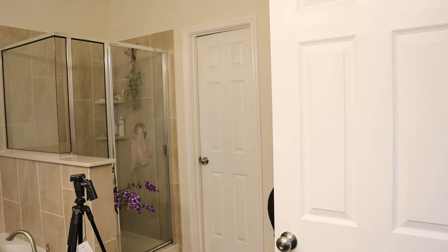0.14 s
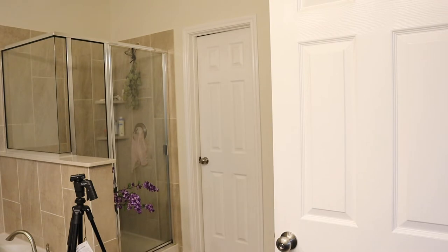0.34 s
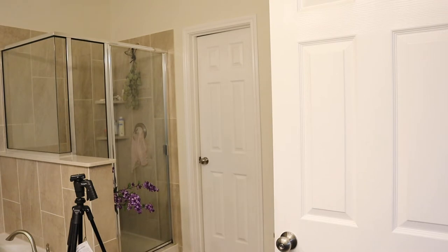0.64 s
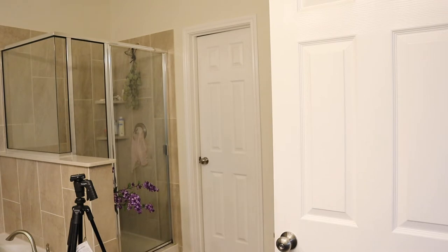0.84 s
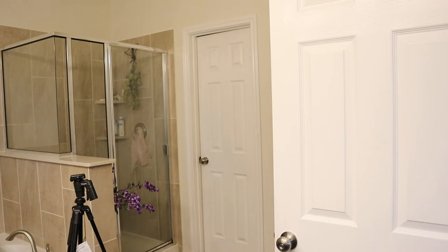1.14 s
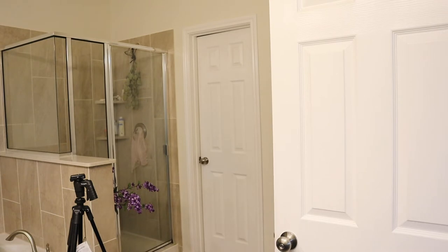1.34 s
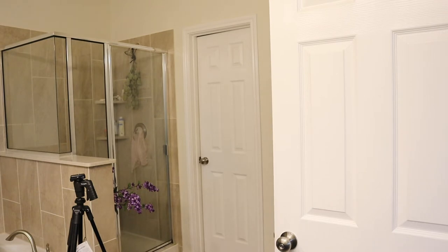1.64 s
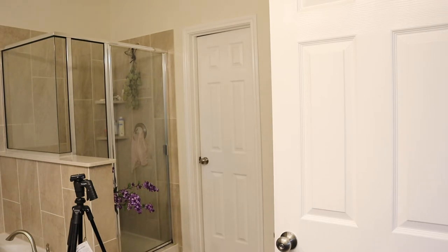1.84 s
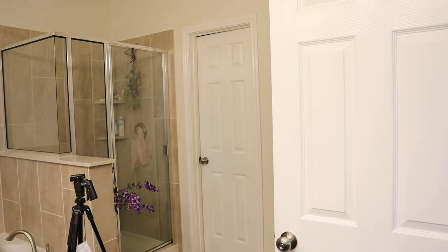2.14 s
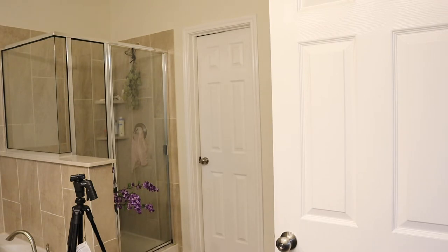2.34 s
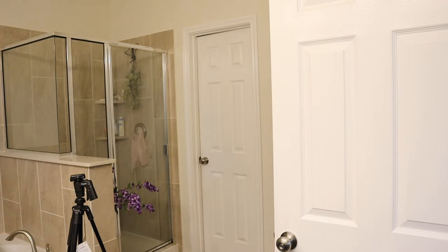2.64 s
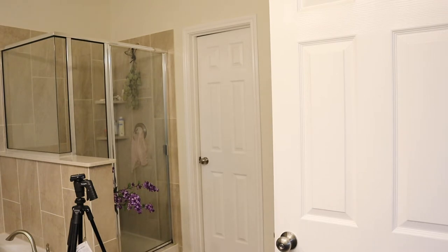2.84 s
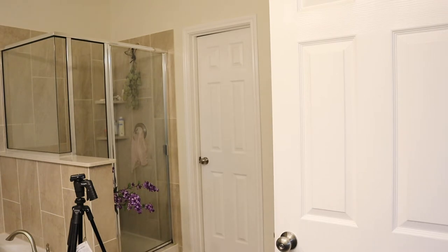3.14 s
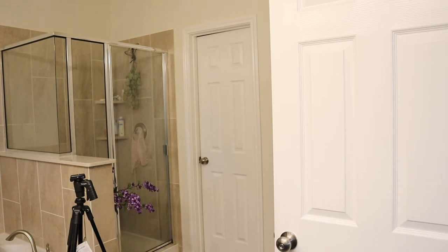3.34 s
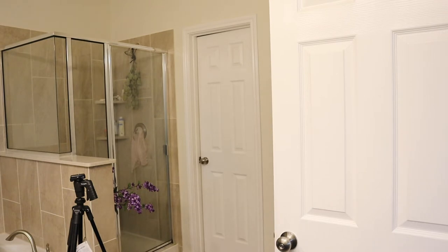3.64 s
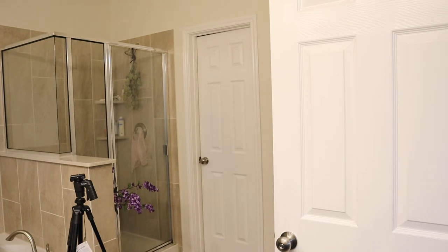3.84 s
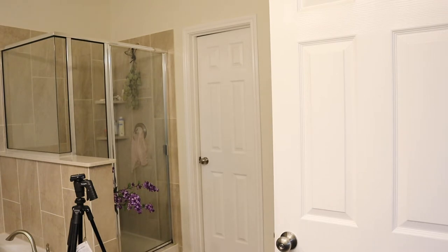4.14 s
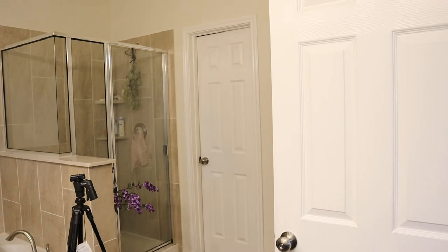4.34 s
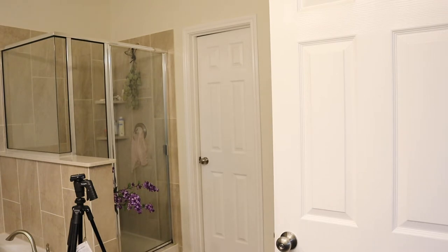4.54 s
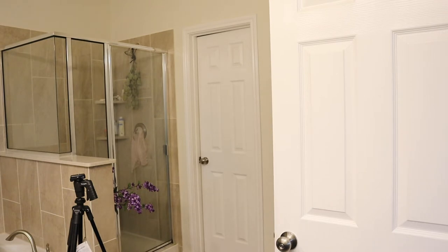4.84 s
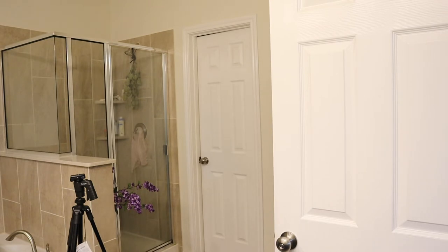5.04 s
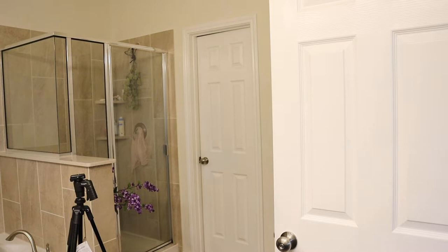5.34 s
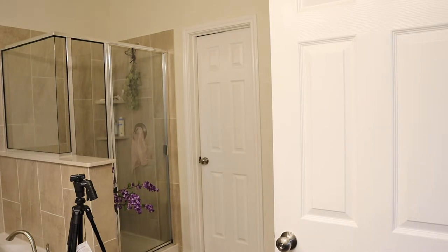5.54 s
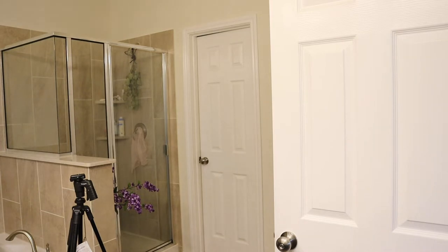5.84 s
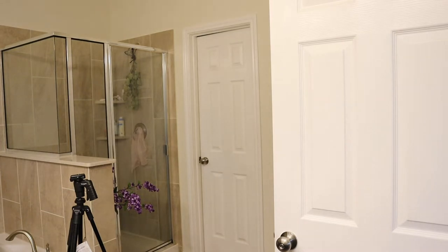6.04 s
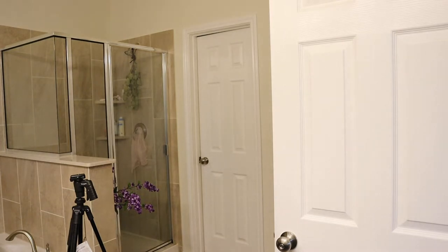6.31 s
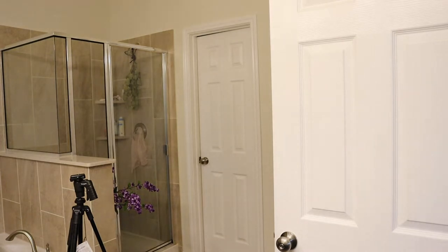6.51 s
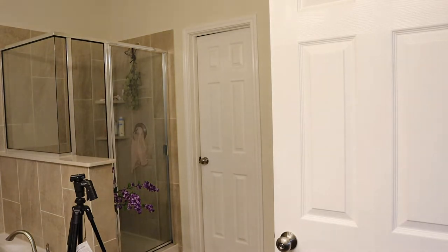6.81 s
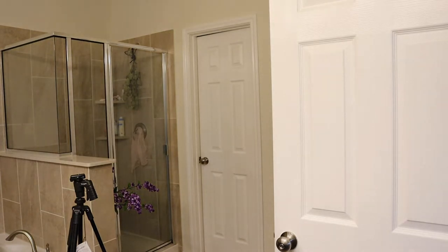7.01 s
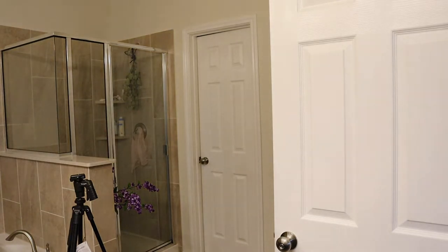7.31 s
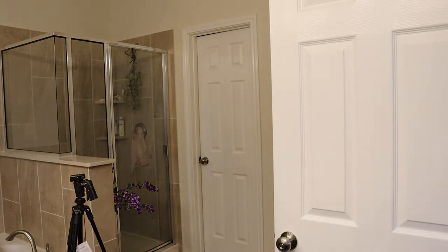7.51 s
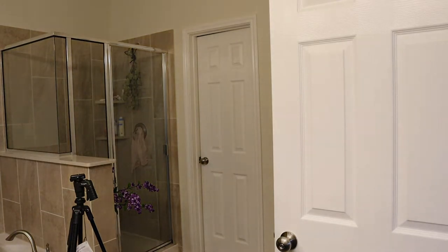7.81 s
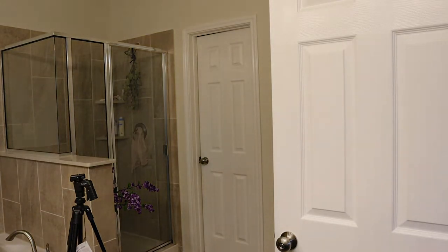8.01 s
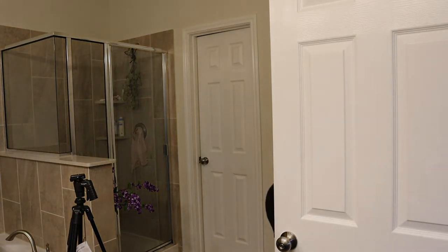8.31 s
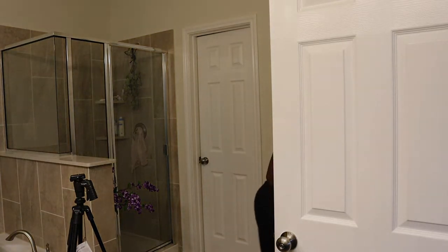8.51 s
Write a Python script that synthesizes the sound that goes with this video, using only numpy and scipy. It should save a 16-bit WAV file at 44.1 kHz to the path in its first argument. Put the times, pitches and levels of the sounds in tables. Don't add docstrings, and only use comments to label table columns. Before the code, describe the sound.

Behind a door in a tiled bathroom, a wooden drawer rattles and slides, small items knock, then cupboard doors bang shut over ventilation rush.

```python
import sys
import numpy as np
from scipy import signal
from scipy.fft import rfft, irfft, next_fast_len
from scipy.io import wavfile
from scipy.ndimage import uniform_filter1d, map_coordinates

SR = 44100
rng = np.random.default_rng(int(sys.argv[2]) if len(sys.argv) > 2 else 0)


def natural_amplitude(level_db):
    exponent = np.asarray(level_db, float) / 20
    return 10 ** exponent


def dump_mix(stems):
    frames = np.atleast_2d(stems).T
    limited = np.clip(frames, -1, 1)
    pcm = np.round(limited * 32767).astype(np.int16)
    wavfile.write(sys.argv[1], SR, pcm)


N = 382347

# pitch_hz, level_db (per Hz)
DRAWER_COLOUR = [(24, -57), (40, -9.5), (186, -2), (291, -1.5), (329, -7), (412, -5.5), (490, -15.5),
                 (612, -14), (710, -9.5), (910, -9.5), (1870, -15.5), (2170, -17.5), (2920, -27.5),
                 (11100, -45), (15000, -57)]
# pitch_hz, level_db, t60_s
DRAWER_PANELS = [(123, -30, 0.093), (190, 0, 0.054), (223, -9, 0.14), (330, -18, 0.13), (299.6, 9.5, 0.26),
                 (361, -44, 0.026), (412, -2, 0.13), (430, -9.5, 0.051), (560, 0.5, 0.093),
                 (700, 6.5, 0.048)]


def knocks():
    # pitch_hz, level_db (per Hz)
    door_colour = [(24, -50), (40, -6.5), (153, 2.5), (298, 2.5), (478, -15), (527, 0), (676, -3.5),
                   (1110, -9), (1230, -11), (1390, -8.5), (1650, -14), (2450, -18), (8690, -34.5),
                   (11400, -38), (15000, -49)]
    # pitch_hz, level_db, t60_s
    door_panels = [(133, -8, 0.067), (162, 30.5, 0.25), (213, 17, 0.021), (283, 3, 0.044), (295, -17, 0.29),
                   (528, 1, 0.077), (676.3, 13.5, 0.36), (805, -4, 0.21), (790, -6, 0.04), (870, -12, 0.31)]
    # start_s, level_db, boom_db, brightness_db, crack_db
    door_knocks = [(0.038, -38.5, -7.5, 7.5, -36), (0.235, -9.5, -16, 5.5, -17),
                   (5.66, -26, -10, 1.5, -18.5), (5.782, -18.5, 7, 4, -19.5),
                   (5.818, -12, -8.5, -25, -27.5), (5.882, -20.5, 0, -6, -24), (6.01, -17.5, -9, -6, -23.5),
                   (6.049, -4, -18.5, -9, -35), (6.069, -2, -10, 2.5, -23), (6.54, -56, -12, 9, 2.5),
                   (6.63, -42, -2, 12, -8.5), (7.196, -25, -1, -0.5, -11), (7.218, -13, -10.5, -8.5, -29),
                   (7.262, -2, -7.5, -1.5, -35), (7.309, -22.5, -18, -20, -18), (7.429, -13, -37, 5.5, -24),
                   (7.465, -5, -11.5, 1, -28), (7.498, -17, -21, -9, -31), (7.559, -10.5, -4.5, 11, -18.5),
                   (7.579, -5.5, -18.5, -29, -44)]
    # start_s, level_db, boom_db, brightness_db, crack_db
    drawer_jolts = [(0.763, -25.5, 10, -0.5, -13.5), (0.789, -21.5, -12, -33, -22),
                    (0.859, -26, -5, -21, -22), (1.012, -14, -11.5, -7, -37), (1.026, -15, -11, -3, -21),
                    (1.496, -41, 1, -13, -39), (1.699, -20, -8, -12, -16), (1.885, -6, -12, -2.5, -19.5),
                    (2.144, -11, -12.5, -6.5, -26), (2.239, -22.5, 0.5, -14, -10.5),
                    (2.43, -19, -1.5, -1, -11), (2.604, -22, 2, -9, -13.5), (2.693, -19.5, -2.5, -34, -59),
                    (2.933, -38, 4, 2, -27), (3.494, -24, -14, -13, -26)]
    # start_s, level_db, boom_db, brightness_db, crack_db
    item_taps = [(0.888, -34.5, 12, 5, -9), (0.918, -47, -7, 1, -23), (1.301, -29, 3.5, -1, -19),
                 (1.329, -37.5, 3, 14, 3), (1.469, -29.5, 3, -3, -15), (1.559, -17, -9, -1.5, -25.5),
                 (1.672, -17, -1.5, 0.5, -20.5), (1.749, -33.5, -32, 11, -1), (1.929, -31, 7, -1, -32),
                 (2.914, -29.5, 0.5, -11, -30), (3.06, -45.5, 3, 11, -2), (3.159, -22.5, -4, -4.5, -19.5),
                 (3.258, -41, -12, 12, -1.5), (3.399, -51, -15, 24, 7), (3.46, -25, -3, -2, -29),
                 (3.59, -40, 4, -4, -10), (3.641, -23.5, -22, 0.5, -18.5), (3.743, -20, -30, 3.5, -23),
                 (4.148, -48, -8, 15, -11), (4.291, -50, -6, 13, -22)]
    doors = blows(door_knocks, door_colour, door_panels, rattle_t60_s=0.031)
    jolts = blows(drawer_jolts, DRAWER_COLOUR, DRAWER_PANELS, rattle_t60_s=0.029)
    taps = blows(item_taps, DRAWER_COLOUR, DRAWER_PANELS, rattle_t60_s=0.039)
    return doors + jolts + taps


def blows(table, colour, panels, rattle_t60_s):
    out, t = np.zeros(N + SR), np.arange(8192) / SR
    swell = fade(t, rattle_t60_s) * (1 - fade(t, 0.042)) ** 2
    for start_s, level_db, boom_db, bright_db, crack_db in table:
        lines = rfft(contacts(len(t), .03, 2.06) * swell)
        flatter = lines / np.abs(lines) ** .8
        blow = irfft(flatter) * np.sqrt(swell)
        blow /= np.linalg.norm(blow)
        body = wood(colour, panels, boom_db + 4.0, bright_db, crack_db + 21.5)
        place(out, natural_amplitude(level_db + 24.5) * signal.fftconvolve(blow, body), start_s - .01)
    return out[:N]


def wood(colour, panels, boom_db, bright_db, crack_db):
    t = np.arange(8192) / SR
    tone = log_gain([(50, boom_db - 6), (110, boom_db), (240, boom_db), (400, 0), (800, 0),
                     (2200, bright_db), (4000, crack_db)], len(t))
    dense = causal(log_gain(colour, len(t)))
    spot = rng.standard_normal(len(panels))
    loaded = np.array(panels) * (1 + np.outer(spot[::-1], [.04, 0, 0]))
    longest_s = .11 if panels is DRAWER_PANELS else 1
    loaded[:, 2] = np.minimum(loaded[:, 2], longest_s)
    body = dense / np.linalg.norm(dense) + natural_amplitude(-3.5) * ring(loaded, 2.2 * spot, t)
    return irfft(rfft(body) * rfft(causal(tone)))


def drawers():
    # peak_s, level_db, rise_s, fall_s
    slides = [(.85, -31.5, 0.08, 0.22), (.98, -23, 0.08, 0.19), (1.58, -22, 0.3, 0.14),
              (2.23, -21.5, 0.25, 0.17), (2.66, -20.5, 0.69, 0.22), (3.13, -30.5, 0.16, 0.11),
              (3.55, -32, 0.22, 0.19), (3.72, -21.5, 0.076, 0.13), (4.2, -41, 0.28, 0.34),
              (5.7, -36, 0.1, 0.083), (5.9, -20.5, 0.084, 0.17), (7.424, -19.5, 0.13, 0.26),
              (7.55, -15.5, 0.12, 0.039)]
    hits, grip = contacts(N, .015, 4.0), walk(30)
    slips = 3 * np.tanh(hits / 3) * natural_amplitude(1.5 * grip)
    body = wood(DRAWER_COLOUR, DRAWER_PANELS, 0.28, 0.37, 0.0)
    rumble = signal.fftconvolve(slips, body)
    opening = unit(uniform_filter1d(grip, size=9000))
    moments = np.arange(N) + np.cumsum(.05 * opening)
    rumble = map_coordinates(rumble, [moments], order=1, mode="mirror")
    return unit(rumble) * envelope(slides) * natural_amplitude(-9.0)


def clinks():
    # start_s, pitch_hz, level_db, t60_s
    bottles = [(1.02, 2184, -32, 0.046), (1.02, 4800, -42.5, 0.018), (.765, 700, -33.5, 0.13),
               (3.745, 780, -29.5, 0.021), (5.4, 1830, -54, 0.025), (1.89, 3580, -46, .15),
               (1.89, 4400, -47, 0.18), (2.425, 1600, -37, 0.12), (2.425, 2660, -39.5, 0.088),
               (2.424, 3890, -49, 0.2), (2.425, 4830, -48, 0.13), (2.425, 5400, -63, 0.11),
               (2.62, 3840, -46, 0.07), (2.93, 1180, -46, 0.11), (4.15, 3260, -62, 0.033),
               (4.2, 3220, -60, 0.033), (4.26, 3170, -60, 0.023), (4.31, 3160, -61, 0.024),
               (4.36, 3300, -62, 0.02), (5.27, 6960, -62, 0.022), (5.27, 9650, -55, 0.011),
               (5.402, 4130, -47.5, 0.028), (5.402, 5660, -57, 0.022), (5.402, 8300, -56, 0.016),
               (5.66, 681, -36.5, 0.14), (5.785, 63.6, -29, 0.1), (5.66, 2970, -53, 0.039),
               (6.54, 3700, -62, 0.035), (6.63, 1750, -51.5, 0.044)]
    # start_s, pitch_hz, level_db, t60_s
    thuds = [(0.784, 294, -27, 0.075), (0.857, 291, -41, 0.091), (1.02, 286, -27.5, 0.086),
             (1.675, 206, -22, .06), (1.886, 190, -36, 0.072), (1.889, 400, -25, 0.14),
             (1.888, 706, -22.5, 0.1), (2.239, 298, -34, 0.095), (2.429, 370, -26.5, 0.07),
             (2.695, 251, -30, 0.11), (5.785, 171, -43, 0.11), (6.111, 285, -16, 0.051),
             (7.262, 670, -15.5, 0.1), (7.466, 847, -15.5, 0.055), (7.575, 272, -18.5, 0.069)]
    out, t = np.zeros(N + SR), np.arange(SR // 3) / SR
    for start_s, hz, level_db, t60_s in bottles + thuds:
        spread = min(.00003 / t60_s ** 2, .08)
        detune = np.linspace(-1, 1, num=5) + 0.33 * rng.standard_normal(5)
        cluster = [(hz * (1 + spread * d), 0, t60_s) for d in detune]
        place(out, natural_amplitude(level_db + 32.5) * ring(cluster, 1.5 * rng.standard_normal(5), t), start_s - .003)
    return out[:N]


def edges():
    # start_s, peak_db, pitch_hz, width_octaves, t60_s
    bursts = [(.252, -18, 643, 1.3, 0.065), (.275, -16, 162, 0.59, 0.13), (.29, -21, 307, 0.47, 0.098),
              (.772, -23.5, 200, 1.8, 0.051), (0.791, -27, 325, 0.82, 0.096), (.889, -56, 1500, 2, .02),
              (1.024, -29, 2260, 0.22, 0.065), (1.876, -23, 394, 1.1, 0.038), (1.887, -12, 215, 2.1, 0.062),
              (1.891, -23, 2050, 0.47, 0.03), (1.95, -25.5, 403, 1.8, 0.035),
              (2.426, -41, 3590, .05, 0.083), (2.428, -26.5, 344, 0.49, 0.022),
              (2.557, -31.5, 700, 2.2, .03), (2.6, -25, 352, 2.5, 0.026), (2.692, -19.5, 270, 0.75, 0.037),
              (5.775, -27, 170, 2.7, 0.065), (5.785, -36, 2500, 4.1, 0.036), (5.882, -27, 300, 1.4, 0.026),
              (6.053, -18, 750, .8, 0.059), (6.066, -29, 2700, 0.55, 0.042), (6.118, -20, 710, 0.88, 0.061),
              (6.19, -16, 610, 0.85, 0.039), (7.26, -10.5, 192, 0.57, 0.049), (7.262, -8, 750, 1.1, 0.072),
              (7.264, -24.5, 1810, 1.3, 0.064), (7.31, -14.5, 700, 1, 0.045), (7.462, -29, 4530, 0.89, .03),
              (7.466, -9, 870, 0.49, 0.048), (7.498, -17.5, 790, 0.48, 0.024),
              (7.532, -23.5, 1000, 2, 0.035), (7.561, -23, 2230, 0.96, 0.061),
              (7.572, -13.5, 277, 0.33, 0.024), (7.62, -16.5, 505, 2.3, 0.13),
              (1.888, -36, 4310, .05, 0.43), (1.886, -15, 715, .15, 0.1), (2.426, -46, 3870, .05, .25),
              (2.426, -28, 1560, 0.087, 0.15), (5.658, -38, 702, 0.11, 0.17),
              (1.89, -32, 10800, 0.93, 0.047)]
    out, t = np.zeros(N + SR), np.arange(4096) / SR
    for start_s, peak_db, hz, octaves, t60_s in bursts:
        k = 2 ** (np.clip(octaves, .05, 3) / 2)
        skirt = min(k ** 6, 4)
        band = causal(log_gain([(hz / k / skirt, -40), (hz / k, -6), (hz, 0), (hz * k, -6),
                                (hz * k * skirt, -40), (hz * k * 16, -100)], len(t)))
        splinters = rng.standard_normal(len(t)) * fade(t, t60_s) * (1 - fade(t, 0.021))
        burst = signal.fftconvolve(splinters, band)
        place(out, natural_amplitude(peak_db + 25) * burst / np.linalg.norm(burst), start_s - .006)
    return out[:N]


def ticks():
    # start_s, peak_db, pitch_hz
    snaps = [(.234, -30, 3000), (.308, -19, 900), (.76, -26, 1000), (0.889, -38, 1500), (1.021, -41, 6000),
             (1.026, -24, 1200), (1.325, -38, 9000), (1.882, -30, 7000), (1.887, -12, 1000),
             (2.242, -30, 6000), (2.423, -28, 6000), (2.784, -36, 1200), (3.403, -51, 7000),
             (3.698, -27, 1200), (4.906, -60, 7000), (5.264, -51, 8000), (5.403, -48, 4000),
             (5.659, -51, 9000), (5.782, -41, 7000), (6.046, -15.5, 800), (6.068, -35, 6000),
             (6.092, -12, 900), (6.12, -6, 700), (7.192, -37, 8000), (7.26, -11, 800), (7.322, -14, 800),
             (7.466, -16.5, 900), (7.498, -13, 850), (7.524, -19, 900), (7.556, -35, 9000),
             (8.546, -44, 9000)]
    # start_s, pitch_hz, level_db, t60_s
    fittings = [(1.887, 4420, -41, .4), (1.887, 3569, -45, .2), (1.887, 2100, -35, .2),
                (1.887, 5464, -52, .15), (1.887, 5819, -52, .15), (2.243, 4960, -50, .08),
                (2.424, 2283, -38, .08), (2.424, 3270, -50, .15), (2.424, 3630, -46, .15),
                (2.425, 4730, -43, .15), (2.424, 5500, -48, .15), (2.424, 5949, -51, .12),
                (2.424, 6300, -56, .12), (2.47, 3908, -52, .3), (2.56, 2692, -42, .1)]
    out, t = np.zeros(N + SR), np.arange(SR // 3) / SR
    k = 2 ** 1.07
    for start_s, peak_db, hz in snaps:
        band = causal(log_gain([(hz / k ** 3, -40), (hz / k, -6), (hz, 0), (hz * k, -6), (hz * k ** 3, -40)], 1024))
        click = np.convolve(rng.standard_normal(1024) * fade(t[:1024], 0.0062), band)
        place(out, natural_amplitude(peak_db + 12) * click / np.linalg.norm(click), start_s - .002)
    for start_s, hz, level_db, t60_s in fittings:
        place(out, natural_amplitude(level_db + 4) * np.sin(2 * np.pi * hz * t) * fade(t, t60_s), start_s)
    return out[:N]


def scuffs():
    # peak_s, level_db, rise_s, fall_s
    cloth = [(.004, -44, .02, 0.015), (.044, -41.5, 0.024, 0.023), (.17, -46, 0.054, 0.12),
             (.45, -47.5, 0.042, 0.24), (4.55, -62, .05, 0.73), (4.8, -76, .4, .03),
             (4.914, -58, 0.079, 0.7), (7.75, -50, 0.021, 0.38), (8.2, -43.5, 0.032, 0.076),
             (8.358, -32, 0.052, 0.036), (8.54, -32, 0.019, 0.029)]
    # peak_s, level_db, rise_s, fall_s
    hands = [(.82, -52, 0.042, 0.3), (.99, -43, 0.073, 0.036), (1.38, -46, 0.14, 0.041),
             (1.87, -39, 0.021, 0.077), (2.11, -71, 0.13, .2), (2.27, -37.5, 0.15, 0.038),
             (2.52, -46, 0.16, 0.16), (3.0, -50, 0.1, 0.16), (3.16, -45, 0.044, 0.092),
             (3.652, -71, 0.4, 0.13), (5.7, -70, 0.089, .3), (6.02, -44, 0.089, 0.15),
             (6.5, -61, 0.07, 1.3)]
    # pitch_hz, level_db
    colour = [(400, -51), (1200, 2.5), (2500, 5), (4000, 7.5), (8000, 4), (12500, 2.5), (15000, -35)]
    grain = rng.standard_normal(N) * natural_amplitude(1.5 * walk(50))
    return unit(shape(grain, colour)) * envelope(cloth + hands) * natural_amplitude(-4.0)


def room():
    # pitch_hz, t60_s
    room_t60 = [(60, 0.59), (250, 0.4), (1000, 0.67), (3000, 0.55), (8000, 0.51), (14000, 0.14)]
    t, tails = np.arange(int(.9 * SR)) / SR, 0
    t60_hz, t60_s = np.transpose(room_t60)
    for hz in 40 * 2 ** np.arange(0, 9, .5):
        band_db = [(hz / 2, -60), (hz / 1.3, -3), (hz, 0), (hz * 1.3, -3), (hz * 2, -60)]
        band = shape(rng.standard_normal((2, len(t))), band_db)
        decay_s = np.interp(np.log(hz), np.log(t60_hz), t60_s)
        tails = tails + band * fade(t, decay_s) / np.sqrt(decay_s)
    tails *= (1 - fade(t, 0.05)) * (1 + 0.54 * fade(t, 0.16))
    tails /= np.linalg.norm(tails, axis=1, keepdims=True)
    tails[:, 0] += natural_amplitude(-15.0)
    return [even(path) for path in tails]


def even(path):
    lines = rfft(path)
    near, broad = (np.log(uniform_filter1d(np.abs(lines) ** 2, size=k)) / 2 for k in (35, 1500))
    return irfft(lines * rfft(causal(broad - near)), len(path))


def air():
    # pitch_hz, level_db (per Hz)
    rush = [(12, -30), (20, -8), (59, -12.5), (128, 0.5), (194, -12), (270, -12.5), (347, -19),
            (3010, -31.5), (3270, -36), (9370, -45.5), (11400, -59), (13100, -51), (15000, -69)]
    # pitch_hz, level_db
    rush_width = [(60, -26), (110, -22), (200, -8), (380, -1), (690, 1), (1270, 2), (2340, 4), (4320, 6),
                  (7950, 7.5), (14600, 6)]
    # pitch_hz, width_hz, level_db
    hum = [
        (72.4, 5.1, -46.5),
        (120, 2.8, -44.5),
    ]
    # time_s, level_db
    draught = [(0, 1.8), (.6, 0), (4.1, 0.2), (4.6, 0.4), (5.1, 1), (5.6, -0.8), (6.6, 0.5), (7.0, 0.5),
               (7.9, -2.5), (8.15, -3.5), (8.67, 2)]
    mid, side = shape(rng.standard_normal((2, N)), rush)
    gusts_db = 1.1 * walk(2.5)
    scale = natural_amplitude(-41.5 - 4.0 + gusts_db / 2) / np.std(mid)
    mid, side = scale * mid, scale * shape(side, rush_width)
    for hz, width_hz, level_db in hum:
        band = signal.butter(1, [hz - width_hz / 2, hz + width_hz / 2], "band", fs=SR, output="sos")
        mid += natural_amplitude(level_db + 1.0 * walk(2.7)) * unit(signal.sosfilt(band, rng.standard_normal(N)))
    return np.array([mid, side]) * natural_amplitude(np.interp(np.arange(N) / SR, *np.transpose(draught)))


def place(out, sound, start_s):
    i = int(start_s * SR)
    out[i:i + len(sound)] += sound


def unit(x):
    return x / np.sqrt(np.mean(x ** 2))


def fade(t, t60_s):
    return np.exp(-np.log(1000) * t / np.maximum(t60_s, .002))


def ring(modes, extra_db, t):
    hz, level_db, t60_s = np.transpose(modes)[:, :, None]
    tones = np.sin(2 * np.pi * hz * t) * fade(t, t60_s)
    y = np.sum(natural_amplitude(level_db + extra_db[:, None]) * tones, axis=0)
    return y / np.linalg.norm(y)


def contacts(size, share, spread_db):
    chance, sign, strength = rng.random((3, size))
    return (chance < share) * np.sign(sign - .5) * natural_amplitude(-spread_db * np.log(strength + 1e-9))


def envelope(strokes):
    t, gain = np.arange(N) / SR, np.zeros(N)
    for peak_s, level_db, rise_s, fall_s in strokes:
        before, after = (peak_s - t) / max(rise_s, .005), (t - peak_s) / max(fall_s, .005)
        gain += natural_amplitude(level_db - 15 * np.maximum(before, after))
    return uniform_filter1d(gain, size=600)


def walk(rate_hz):
    k = int(SR / rate_hz)
    steps = np.repeat(rng.standard_normal(N // k + 1), k)
    return unit(uniform_filter1d(uniform_filter1d(steps, k), k)[:N])


def log_gain(points, size):
    hz, db = np.transpose(points)
    bins_hz = np.arange(size // 2 + 1) * SR / size
    return np.log(natural_amplitude(np.interp(np.log(bins_hz + 1), np.log(hz), db)))


def shape(x, points):
    size = next_fast_len(x.shape[-1])
    return irfft(rfft(x, size) * np.exp(log_gain(points, size)), size)[..., :x.shape[-1]]


def causal(log_g):
    c = irfft(log_g)
    c[1:len(c) // 2] *= 2
    c[len(c) // 2 + 1:] = 0
    return irfft(np.exp(rfft(c)))


def scene():
    # pitch_hz, level_db
    width = [(60, -36), (110, -35), (200, -22), (380, -8), (690, -3.5), (1270, -1), (2340, 3), (4320, 5.5),
             (7950, 8), (14600, 6)]
    sources = knocks() + clinks() + drawers() + scuffs()
    paths, background, sharp = room(), air(), edges() + ticks()
    heard = []
    for path in paths:
        doorway = path * fade(np.arange(len(path)) / SR, 0.055)
        sharp_path = 0.59 * path + doorway / np.linalg.norm(doorway)
        heard.append(signal.fftconvolve(sources, path)[:N] + signal.fftconvolve(sharp, sharp_path)[:N])
    mid, side = np.array([heard[0], -shape(heard[1], width)]) + background
    return np.array([(mid + side) * natural_amplitude(.35), (mid - side) * natural_amplitude(-.35)])


def roll_off(x):
    return signal.sosfilt(signal.butter(12, 15250, fs=SR, output="sos"), x)


def record(dry):
    # pitch_hz, level_db
    mic = [(20, -16), (45, -2.5), (70, 0), (13500, -1.5), (15000, -10), (15600, -40)]
    rounded = np.tanh(0.54 * shape(dry, mic)) / 0.67
    return roll_off(rounded)


dry = scene()
out = record(dry)
dump_mix(out)
```